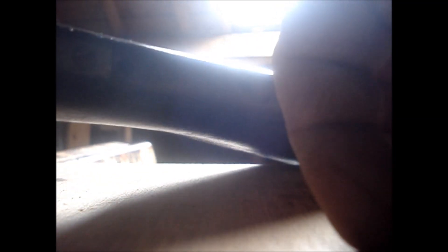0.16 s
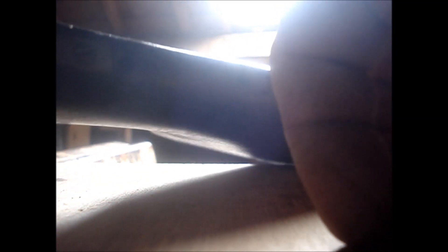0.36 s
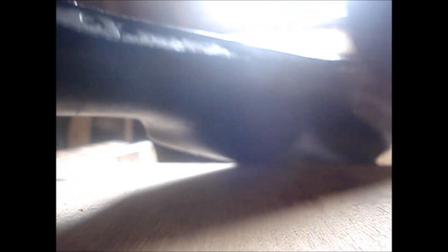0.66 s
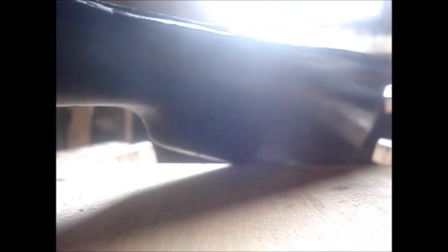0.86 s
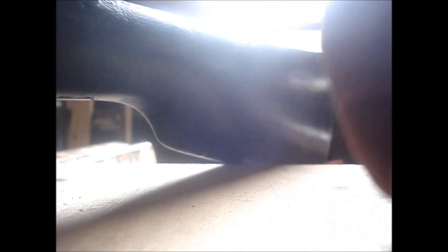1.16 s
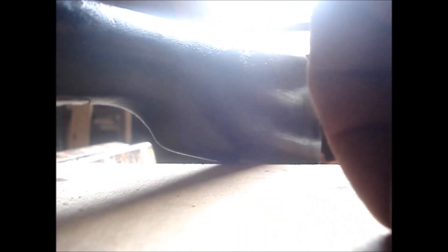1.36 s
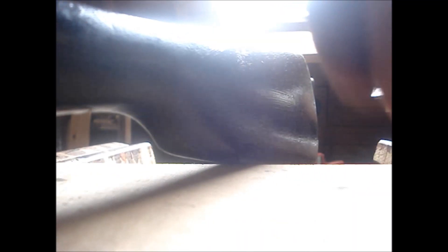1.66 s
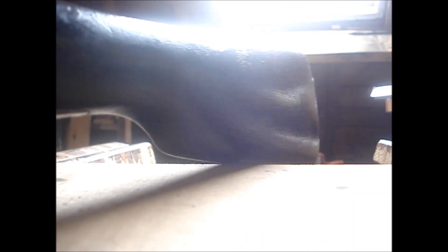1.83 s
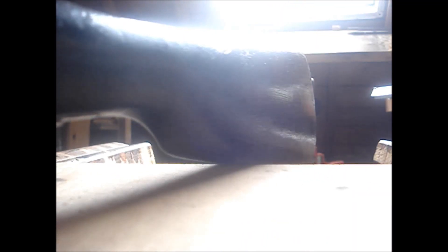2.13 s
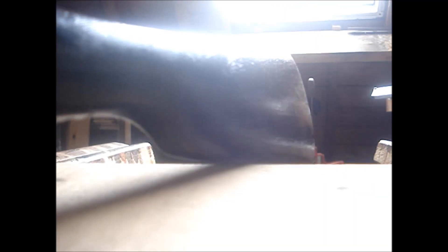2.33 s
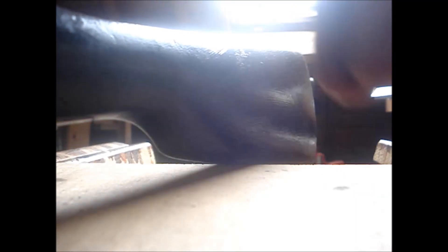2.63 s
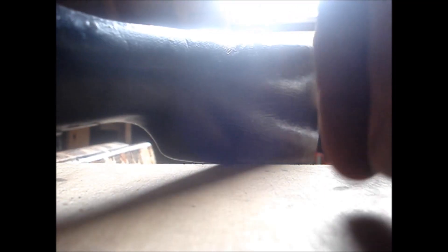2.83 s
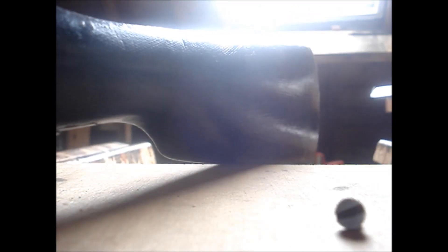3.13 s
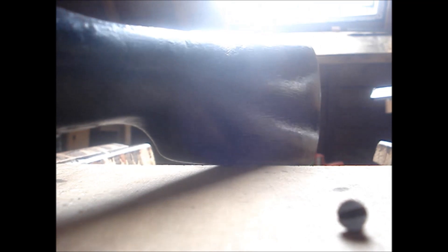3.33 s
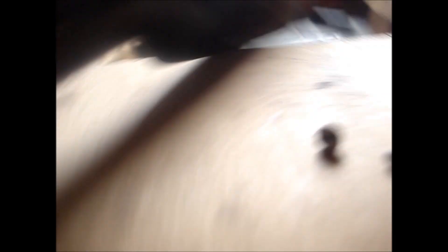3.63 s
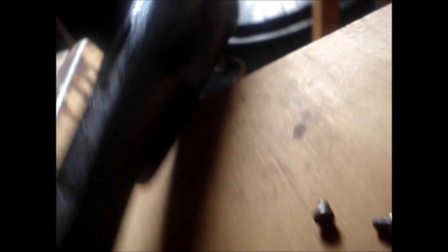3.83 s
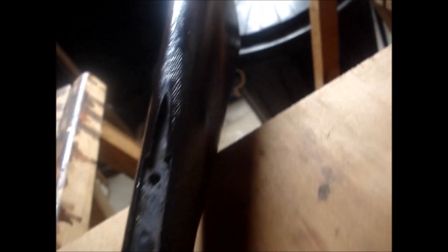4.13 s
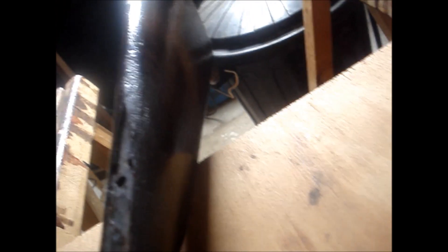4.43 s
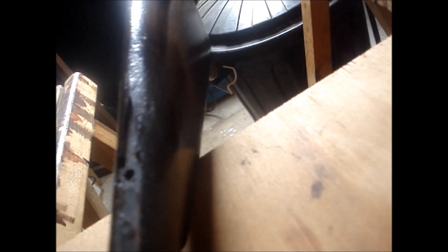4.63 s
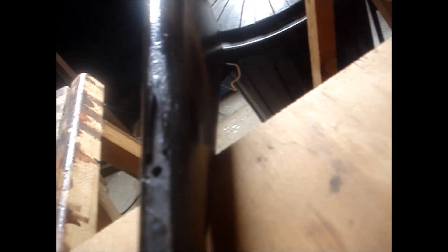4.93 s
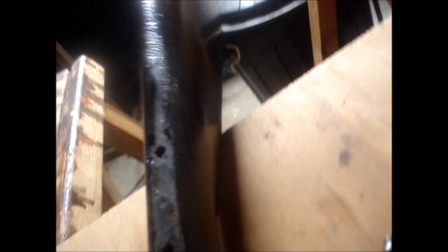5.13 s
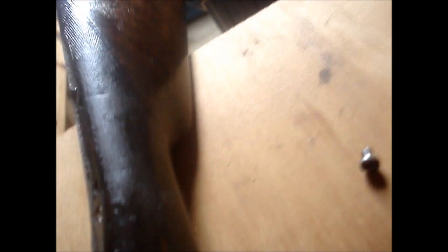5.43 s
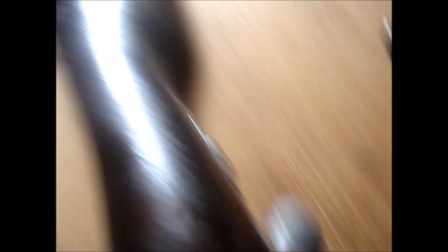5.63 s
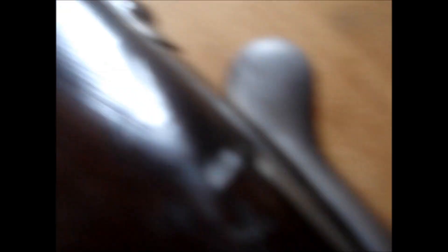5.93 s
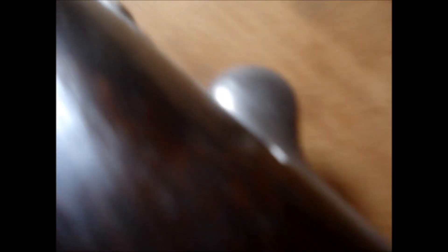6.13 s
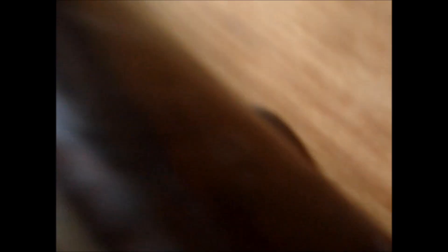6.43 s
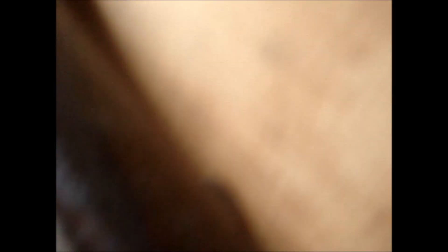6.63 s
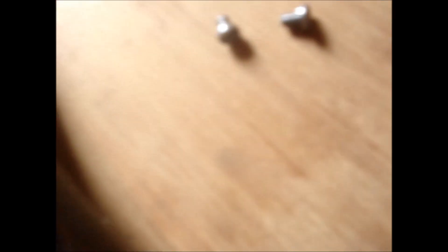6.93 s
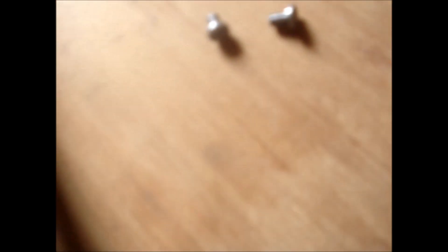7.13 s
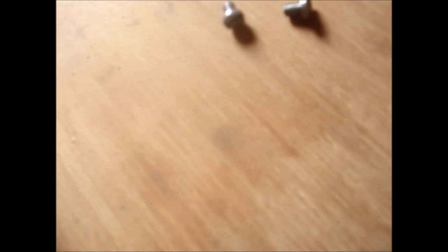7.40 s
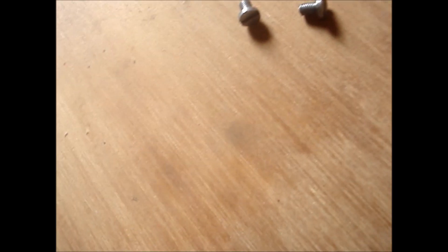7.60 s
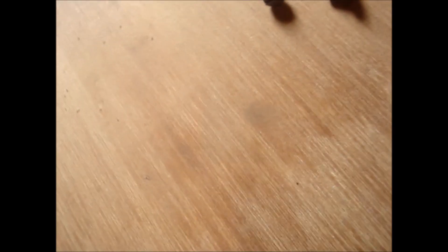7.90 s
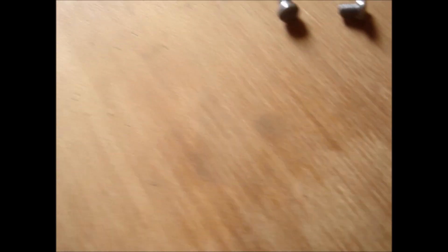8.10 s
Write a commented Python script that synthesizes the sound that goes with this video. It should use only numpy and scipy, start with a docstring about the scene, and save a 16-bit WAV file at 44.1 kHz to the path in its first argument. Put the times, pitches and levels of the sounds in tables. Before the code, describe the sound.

Sharp metal clinks and quiet finger rubbing give way to hard wooden knocks, gritty scrapes and low bench shudders in a small dry room.

```python
"""Steel parts handled on a wooden workbench, very close to a small camera microphone; steady hiss, thin whine.
0-1.6 s: a latch clinks and rubs; blows ring steel and bench modes, a small dry room answers.
2-3.9 s: drags feed the modes with dense grains under finger rustle; a screw clinks; low shudders rock the top.
From 4.3 s: ticks crack, then harder blows; a lever clinks, a block rubs, a wooden stock knocks and judders
in slips, to 8.3 s."""
import sys
import numpy as np
from scipy import signal
from scipy.fft import rfft, irfft
from scipy.io import wavfile

SR = 44100
rng = np.random.default_rng(int(sys.argv[2]) if len(sys.argv) > 2 else 0)


def gain_from_decibels(decibels):
    """Convert decibel values to linear amplitude factors."""
    exponent = np.asarray(decibels, float) / 20
    return 10 ** exponent


def master(y):
    """Save y as 16-bit WAV."""
    cut = np.clip(np.atleast_2d(y).T, -1, 1)
    pcm = np.round(cut * 32767)  # scale
    wavfile.write(sys.argv[1], SR, pcm.astype(np.int16))


N = 364266


def rms_one(x):
    """Scale to rms 1."""
    return x / np.sqrt(np.mean(x ** 2) + 1e-20)


def peak_one(x):
    """Scale to peak 1."""
    return x / (np.max(np.abs(x)) + 1e-20)


def drift(corner_hz):
    """Slow chance, rms 1: white noise through a double pole."""
    pole = np.exp(-2 * np.pi * corner_hz / SR)
    white = rng.standard_normal(N + SR)
    return rms_one(signal.lfilter([1], [1, -2 * pole, pole * pole], white)[SR:])


def coloured_noise(spectrum):
    """Noise shaped by a (hz, db_per_hz) outline; rms 1."""
    hz, db = np.transpose(spectrum)
    bins_hz = np.arange(N // 2 + 1) * SR / N + 1
    gain = gain_from_decibels(np.interp(np.log(bins_hz), np.log(hz), db))
    return rms_one(irfft(rfft(rng.standard_normal(N)) * gain, N))


def rings(modes, count=0, minor_db=-5.0):
    """One decaying sine per mode, as rows; count weaker modes fill the gaps between them."""
    modes = np.array(modes, float)
    steps = (np.arange(count) + rng.random(count)) / max(count, 1)
    minor_hz = modes[0, 0] + (modes[-1, 0] - modes[0, 0]) * steps
    minor_level_db = np.interp(minor_hz, *modes.T[:2]) + minor_db
    minor_t60_s = np.interp(minor_hz, *modes.T[::2])
    hz, db, t60_s = np.hstack([modes.T, [minor_hz, minor_level_db, minor_t60_s]])[:, :, None]
    t = np.arange(SR // 4) / SR
    return gain_from_decibels(db - 60 * t / np.maximum(t60_s, .003)) * np.sin(2 * np.pi * hz * t)


STROKE_EDGE_DB, STROKE_ROUNDNESS = -14, 1.34


def swell(t, start_s, firmest_s, end_s):
    """Gain of a stroke that firms up and fades, STROKE_EDGE_DB at start and end."""
    rising = (firmest_s - t) / (firmest_s - start_s)
    fading = (t - firmest_s) / (end_s - firmest_s)
    away = np.where(t < firmest_s, rising, fading)
    return gain_from_decibels(STROKE_EDGE_DB * away ** STROKE_ROUNDNESS)


# noise floor outline: hz, level_db_per_hz
HISS_SPECTRUM = [(12, -81), (20, -21), (54, -12), (118, -6.5), (184, -4.5), (319, -2.5), (383, -4),
                 (698, -7), (1010, -8.5), (3440, -15.5), (5650, -18), (7730, -22), (10300, -23.5),
                 (13400, -46), (22000, -120)]
HISS_DB, WHINE_DB, WHINE_HZ = -50, -66.5, 7590  # rms levels


def hiss():
    """Steady noise floor and a wavering electrical whine."""
    phase_rad = 2 * np.pi * WHINE_HZ * np.arange(N) / SR + 1.3 * drift(9)
    whine = np.sqrt(2) * np.sin(phase_rad)
    return gain_from_decibels(HISS_DB) * coloured_noise(HISS_SPECTRUM) + gain_from_decibels(WHINE_DB) * whine


# blows: start_s, steel_peak_db, bench_peak_db, brightness_db (added to bright steel, taken from low steel)
CONTACTS = [(0.0462, -13.5, -43, -1), (0.0503, -21.5, -41, 20.5), (0.062, -44, -48, -1),
            (0.089, -20, -46, 8), (0.0725, -51, -52, -5), (0.105, -37, -41, -7), (0.1399, -11, -46, 10.5),
            (0.3533, -21, -45, 1), (0.6962, -36, -42, -7), (0.7086, -50, -16, -17), (1.3063, -45, -62, -9),
            (1.5341, -22, -57, 5.5), (1.5514, -20, -56.5, 1), (2.1764, -43, -61, 12),
            (2.4991, -42, -33, 7.5), (2.878, -27, -14.5, -4.5), (2.891, -33, -13.5, -3),
            (2.936, -13, -42, 18), (2.9772, -25, -45, -9.5), (3.008, -26, -43, 4.5),
            (3.0599, -15.5, -38, 1), (3.0874, -22.5, -35, 2.5), (3.371, -42, -37, -4.5),
            (3.4226, -40, -57, 2), (3.618, -43, -55, 1), (3.899, -49, -39.5, 9), (4.3805, -32.5, -55, 16),
            (5.225, -15, -12, -4), (5.2325, -13.5, -7.5, 6.5), (5.266, -28, -12.5, -4.5),
            (5.3161, -28, -19, 9), (5.392, -40, -20, -8.5), (5.4267, -14.5, -1, 8.5),
            (5.434, -20.5, -5, -11.5), (5.442, -26.5, -16, 15.5), (5.449, -27.5, -10, -10),
            (5.609, -37, -50, 8), (5.7743, -24.5, -13.5, 2), (5.823, -34, -30, 4.5), (5.996, -42, -38, 11),
            (6.0873, -25, -34, 5.5), (6.166, -21, -24, 5.5), (6.405, -25, -19, -5), (6.4176, -21, -15.5, 6),
            (6.4463, -34.5, -17.5, 8), (6.492, -41, -22, -8.5), (6.5918, -23, -23.5, 0),
            (6.702, -34, -51.5, 12), (6.836, -25, -7.5, -5), (7.0777, -29.5, -18, 6),
            (7.1164, -23.5, -9, 4), (7.4877, -40, -20.5, -16.5), (7.677, -16.5, -8, -6.5),
            (7.8059, -19, -12, -4), (7.8153, -22, -13, -6), (7.824, -16.5, -20, 3), (8.0245, -30, -12, 1),
            (8.221, -51.5, -25, -9)]
# bench top modes: pitch_hz, level_db, t60_s
BENCH_MODES = [(174, -5.5, 0.08), (247, 0.5, 0.059), (312, 4.5, 0.06), (400, -1, 0.08254), (430, 1, 0.057),
               (480, -7, 0.038), (539, -7.5, 0.081), (556.4, 3.5, 0.054), (619, -15.5, 0.099),
               (735, -1, 0.026), (860, -7.5, 0.04), (1046, -43, 0.094)]
# lowest bench modes: pitch_hz, level_db, t60_s
BOOM_MODES = [(91.53, -0.5, 0.097), (111, 2.5, 0.078), (128, -5, 0.13)]
# low steel modes: pitch_hz, level_db, t60_s
LOW_STEEL_MODES = [(590.3, -0.5, 0.17), (705, -3.5, 0.082), (908, 1, 0.04), (1106, 0.5, 0.029045),
                   (1326, 1.5, 0.036), (1546, -8.5, 0.11)]
# middle steel modes: pitch_hz, level_db, t60_s
STEEL_MODES = [(1690, -4.5, 0.05667), (1883, -6, 0.078), (2050, -6, 0.099), (2300, -2, 0.0603),
               (2460, -2.5, 0.03266), (2790, -10, 0.0859), (3100, -7, 0.035), (3210, 5, 0.0094)]
# bright steel modes: pitch_hz, level_db, t60_s
BRIGHT_STEEL_MODES = [(3470, -0.5, 0.04572), (3950, 6, 0.022), (4408.5, -10, 0.1), (4943, 8, 0.015),
                      (5210, 6, 0.0069), (4840, -19, 0.024), (5360, -20, 0.05), (6630, -11.5, 0.011),
                      (7005, -31, 0.016), (8700, -39, 0.0074), (9670, -42.5, .01)]
LOW_STEEL_DB, BRIGHT_STEEL_DB = 1.5, -10.5  # re middle modes, at brightness 0
CHATTER_T60_S, RATTLE_DB, RATTLE_T60_S = 0.04, -38.5, 0.16
OPPOSED_SHARE = 0.38  # modes that start against the blow


def contacts(spread_db=2.0, chatter_db=-5.0, even_hz=4000, hardening=0.7, boom_db=-16.0, ring_per_chatter=8.1):
    """A blow and its dying micro-bounces strike every mode with a strength of its own."""
    out, t = np.zeros(N + SR), np.arange(SR // 8) / SR
    bench = np.vstack([rings(BENCH_MODES, count=16), gain_from_decibels(boom_db) * rings(BOOM_MODES)])
    steel = rings(STEEL_MODES, count=45)
    low_steel = rings(LOW_STEEL_MODES, count=25)
    bright_steel = rings(BRIGHT_STEEL_MODES, count=80)
    bodies = [steel, bench, low_steel, bright_steel]
    # the holding hand damps the ringing
    grip = gain_from_decibels(-60 * np.arange(SR // 4) / SR / (ring_per_chatter * CHATTER_T60_S))
    for start_s, steel_db, bench_db, brightness_db in CONTACTS:
        low_db = steel_db + LOW_STEEL_DB - brightness_db
        bright_db = steel_db + BRIGHT_STEEL_DB + brightness_db
        bounces = rng.standard_normal(t.size) * (rng.random(t.size) < .04)
        force = bounces * gain_from_decibels(chatter_db - 60 * t / CHATTER_T60_S)
        # loose play rattles on
        force += rng.standard_normal(t.size) * gain_from_decibels(RATTLE_DB - 60 * t / RATTLE_T60_S)
        force[0] = 1
        # mostly into wood: long soft push; steel on steel: short hard one
        contact_hz = np.clip(even_hz * gain_from_decibels(hardening * (steel_db - bench_db)), 300, 15000)
        force = signal.lfilter(*signal.butter(2, contact_hz, fs=SR), force)
        for body, peak_db in zip(bodies, (steel_db, bench_db, low_db, bright_db)):
            strengths = gain_from_decibels(spread_db * rng.standard_normal(len(body)))
            strengths = strengths * np.sign(rng.random(len(body)) - OPPOSED_SHARE)
            sound = signal.fftconvolve(force, grip * (strengths @ body))
            out[round(start_s * SR):][:sound.size] += gain_from_decibels(peak_db) * peak_one(sound)
    return out[:N]


# latch modes: pitch_hz, level_db, t60_s
LATCH_MODES = [(589.21, 1.5, 0.2), (900, -2, 0.03), (1310, -5.5, 0.0745), (1740, -3.5, 0.099),
               (2150, 2, 0.13), (1914, -10, 0.064), (2330, 1.5, .07), (2548, 2, 0.089), (3005, -0.5, 0.064),
               (3270, 2, 0.05), (3610, -2, 0.075), (4160, -9, 0.04), (4550, -2, 0.041), (4870, 10.5, 0.021),
               (5130, -12, 0.02)]
# latch taps: start_s, peak_db
LATCH_CLINKS = [(.0463, -10), (.0506, -7), (.0892, -10), (.106, -39), (.1398, -3.5), (.1445, -16),
                (.3495, -23.5), (.3535, -17.5), (.237, -39), (1.535, -30), (1.551, -27)]
# screw modes: pitch_hz, level_db, t60_s
SCREW_MODES = [(617.93, -20, .03), (877.6, -0.5, 0.033), (1334, 3, 0.053), (1648.4, 1, 0.055),
               (2120, -7, .04), (2440, -11, 0.05), (2720, 0.5, 0.04256), (3386, -2.5, 0.055),
               (3796.3, 0, 0.035), (4200, -4.5, 0.033), (4869.6, -7, .02), (5500, -11, .02),
               (6330, -6.5, .02), (6540, -22, .02), (7160, -24, .02)]
# screw taps: start_s, peak_db
SCREW_CLINKS = [(2.9365, -10), (2.939, -9.5), (2.9775, -12.5), (2.9992, -24), (3.0078, -20.5),
                (3.0593, -16), (3.063, -19), (3.0873, -19.5), (3.093, -33)]
# lever modes: pitch_hz, level_db, t60_s
LEVER_MODES = [(1250, -6, 0.061), (2040, -15, 0.064), (2130, 4, 0.021), (2280, 1, 0.023),
               (2600, -2.5, 0.029), (2895.5, -4, 0.033), (3180, -10.5, .03), (3670, -4, 0.024),
               (4220, -11.5, .03), (4600, -16, .03), (5800, -14, 0.035), (5900, -30, .04),
               (6630, -13.5, 0.052), (8050, -25, .04)]
# lever taps: start_s, peak_db
LEVER_CLINKS = [(5.7745, -13), (5.812, -28), (5.824, -27.5), (5.997, -33), (6.089, -38), (6.166, -5.5),
                (6.18, -24), (6.418, -26), (7.128, -30), (7.18, -36), (7.296, -33), (7.364, -25.5),
                (7.494, -22), (7.534, -28), (7.775, -25.5), (7.807, -22.5), (7.824, -16)]
# wooden stock modes: pitch_hz, level_db, t60_s
STOCK_MODES = [(565, -6.5, 0.029), (734, 6, 0.041), (894, -5.5, 0.11), (1013, -6.5, 0.018),
               (1303.8, -10.5, 0.031), (1570, -11, 0.047), (1884, -14.5, 0.046)]
# stock knocks: start_s, peak_db
STOCK_KNOCKS = [(2.8785, -22), (2.892, -27), (5.4268, -6.5), (5.443, -8), (5.4495, -7.5), (6.407, -17),
                (6.836, -10.5), (7.059, -25), (7.077, -25), (7.108, -20), (7.489, -11), (7.677, -2.5),
                (7.703, -11), (7.806, -22), (7.83, -21), (8.025, -28), (8.034, -24)]
GRIP_T60_S = .1


def clinks(spread_db=3.0, chatter_db=-29.5, chatter_t60_s=0.034, hardening=0.29, full_db=-4.5):
    """A tap and its brief chatter ring the hand-damped modes of one piece; weak taps and wood are softer."""
    out, t = np.zeros(N + SR), np.arange(SR // 16) / SR
    # modes, taps, contact corner in Hz of a tap at full_db
    pieces = [(LATCH_MODES, LATCH_CLINKS, 9000), (SCREW_MODES, SCREW_CLINKS, 7000),
              (LEVER_MODES, LEVER_CLINKS, 9000), (STOCK_MODES, STOCK_KNOCKS, 2500)]
    grip = gain_from_decibels(-60 * np.arange(SR // 4) / SR / GRIP_T60_S)
    for modes, taps, full_hz in pieces:
        body = rings(modes, count=48, minor_db=-7.0) * grip
        count = len(body)
        signs = (-1) ** np.arange(count)
        chances = rng.standard_normal((len(taps), count + t.size))
        for (start_s, peak_db), chance in zip(taps, chances):
            force = chance[count:] ** 3 * gain_from_decibels(chatter_db - 60 * t / chatter_t60_s)
            force[0] = 1
            contact_hz = np.clip(full_hz * gain_from_decibels(hardening * (peak_db - full_db)), 300, 15000)
            force = signal.lfilter(*signal.butter(2, contact_hz, fs=SR), force)
            strengths = gain_from_decibels(spread_db * chance[:count]) * signs
            sound = signal.fftconvolve(force, strengths @ body)
            out[round(start_s * SR):][:sound.size] += gain_from_decibels(peak_db) * peak_one(sound)
    return out[:N]


ROOM_T60_S, ROOM_DB, ROOM_CUT_HZ = 0.2, -20, 2070


def room(x):
    """A dull dying noise tail that starts after the first wall echo."""
    t = np.arange(SR // 3) / SR
    tail = rng.standard_normal(t.size) * gain_from_decibels(-60 * t / ROOM_T60_S) * (t > .004)
    tail = signal.lfilter(*signal.butter(1, ROOM_CUT_HZ, fs=SR), tail)
    return signal.fftconvolve(x, gain_from_decibels(ROOM_DB) * tail / np.sqrt(np.sum(tail ** 2)))[:N]


# edges catching: start_s, peak_db
TICKS = [(0.0516, -43), (0.0876, -45), (0.141, -42), (1.5345, -56), (2.935, -23.5), (3.057, -53),
         (3.4241, -36), (3.5129, -38), (4.38, -22), (4.4124, -48), (5.2291, -12), (5.316, -24.5),
         (5.432, -22), (5.772, -38), (6.087, -28), (6.1674, -23), (6.4172, -22), (6.5983, -17),
         (6.7047, -32.5), (7.1277, -26.5), (7.18, -26.5), (7.4809, -32), (7.6809, -21.5), (7.734, -27),
         (7.8092, -38), (7.87, -27)]
TICK_T60_S, TICK_LOW_HZ = 0.041, 3500


def ticks():
    """Sharp bright cracks of dying high-passed noise."""
    out, t = np.zeros(N + SR), np.arange(SR // 20) / SR
    noise = rng.standard_normal((len(TICKS), t.size)) * gain_from_decibels(-60 * t / TICK_T60_S)
    cracks = signal.lfilter(*signal.butter(2, TICK_LOW_HZ, "high", fs=SR), noise)
    for (start_s, peak_db), crack in zip(TICKS, cracks):
        out[round(start_s * SR):][:t.size] += gain_from_decibels(peak_db) * peak_one(crack)
    return out[:N]


# latch rubbed along a surface: start_s, firmest_s, end_s, level_db
LATCH_RUBS = [(0.052, 0.054, .08, -39), (0.098, 0.11, 0.11014, -34), (.142, 0.159, .22, -31),
              (.354, 0.356, .39, -42), (1.54, 1.548, 1.6, -41)]
# screw rubbed: start_s, firmest_s, end_s, level_db
SCREW_RUBS = [(2.936, 2.954, 2.975, -27), (2.983, 2.99, 3.0, -43), (2.998, 3.01, 3.04, -40),
              (3.059, 3.062, 3.078, -29.5), (3.085, 3.094, 3.11, -38)]
# lever rubbed: start_s, firmest_s, end_s, level_db
LEVER_RUBS = [(5.79, 5.82, 5.85, -41), (6.0, 6.05, 6.12, -49.5), (6.17, 6.185, 6.23, -45),
              (6.225, 6.289, 6.4, -42.5), (6.366, 6.45, 6.458, -39), (7.072, 7.13, 7.26, -43),
              (7.33, 7.362, 7.42, -46), (7.45, 7.526, 7.7, -33.5), (7.81, 7.83, 7.9, -36)]
# modes of a small block pushed over wood: pitch_hz, level_db, t60_s
BLOCK_MODES = [(383, -14, .06), (780, -10, 0.047), (1038.4, 1.5, 0.12), (1363, -1.5, 0.091),
               (1630, -10, .06), (2130, -13, .08), (2650, -16, .05)]
# block rubbed: start_s, firmest_s, end_s, level_db
BLOCK_RUBS = [(2.756, 2.778, 2.83, -30), (2.783, 2.827, 2.86, -34), (5.248, 5.248, 5.33, -33),
              (5.43, 5.45, 5.52, -29), (7.09, 7.16, 7.25, -30.5), (7.35, 7.402, 7.46, -37),
              (7.467, 7.52, 7.68, -27.5), (7.81, 7.825, 7.88, -31), (8.024, 8.033, 8.07, -34.5)]


def rubs(damping=0.63, lumpy_db=4.5):
    """Gritty friction and loose play keep the modes of a small piece sounding."""
    t, out = np.arange(N) / SR, 0
    # modes, strokes, low-pass corner in Hz
    pieces = [(LEVER_MODES, LEVER_RUBS, 6000), (SCREW_MODES, SCREW_RUBS, 3200),
              (LATCH_MODES, LATCH_RUBS, 7000), (BLOCK_MODES, BLOCK_RUBS, 3000)]
    for modes, strokes, soft_hz in pieces:
        grit = rng.standard_normal(N)
        grit = rms_one(grit * np.abs(grit) * gain_from_decibels(lumpy_db * drift(50)))
        level = sum(gain_from_decibels(level_db) * swell(t, *stroke) for *stroke, level_db in strokes)
        rows = rings(np.multiply(modes, [1, 1, damping]), count=20, minor_db=-8.0)
        body = signal.lfilter(*signal.butter(2, soft_hz, fs=SR), rows.sum(axis=0))
        out = out + signal.fftconvolve(level * grit, body)[:N] / np.sqrt(np.sum(body ** 2))
    return out


# dragging and rubbing strokes: start_s, firmest_s, end_s, bench_db, rustle_db
DRAGS = [(0.626, 0.707, .71, -54, -48.5), (0.7, 0.716, .8, -60, -56.5), (1.26, 1.318, 1.42, -47.5, -57.5),
         (1.55, 1.58, 1.64, -51, -65.5), (2.748, 2.797, 2.87, -44.5, -44), (3.35, 3.37, 3.41, -55, -52.5),
         (3.427, 3.427, 3.49, -49.5, -45.5), (3.49, 3.534, 3.61, -49.5, -39.5),
         (3.62, 3.635, 3.75, -50, -55), (3.943, 3.97, 4.05, -51.5, -51.5), (4.339, 4.386, 4.42, -38, -62),
         (5.266, 5.293, 5.36, -22.5, -51), (5.343, 5.434, 5.56, -30, -52.5), (5.557, 5.732, 5.82, -29, -42),
         (5.987, 6.105, 6.17, -34.5, -52.5), (6.222, 6.302, 6.35, -32.5, -45.5),
         (6.316, 6.396, 6.55, -31.5, -45.5), (6.355, 6.45, 6.465, -33, -41), (7.53, 7.6, 7.68, -32, -48),
         (6.52, 6.602, 6.64, -32.5, -62), (0.803, .86, .95, -69, -85), (5.867, 5.934, 5.99, -52.5, -53),
         (6.922, 6.928, 6.99, -37, -65), (7.072, 7.15, 7.27, -17, -42.5), (7.245, 7.29, 7.34, -27, -50),
         (7.32, 7.393, 7.44, -27.5, -49), (7.42, 7.46, 7.49, -18.5, -45.5), (7.48, 7.5, 7.64, -16, -41),
         (7.66, 7.695, 7.75, -18, -42), (7.726, 7.8, 7.95, -27.5, -47.5), (8.019, 8.02, 8.15, -42.5, -57),
         (8.185, 8.223, 8.27, -38.5, -72.5)]
# steel sliding on steel: start_s, firmest_s, end_s, level_db
SLIDES = [(1.304, 1.32, 1.36, -50), (0.084, 0.11, 0.12, -33.5), (2.975, 3.01, 3.04, -49),
          (3.51, 3.54, 3.58, -45.5), (6.23, 6.3, 6.37, -57), (5.43, 5.445, 5.5, -31.5),
          (7.81, 7.826, 7.87, -23.5)]
DRAG_BOOM_DB, DRAG_STEEL_DB = -19.5, 1  # boom re bench; steel offset
STEEL_FOLLOWS_BENCH = 0.48983  # 0: steel follows rustle, 1: bench


def drag_levels():
    """One pressure sets boom, bench, steel and rustle of a stroke; slides add steel."""
    t, levels = np.arange(0, N / SR + .002, .001), np.zeros((4, 1))
    for *stroke, bench_db, rustle_db in DRAGS:
        steel_db = DRAG_STEEL_DB + rustle_db + STEEL_FOLLOWS_BENCH * (bench_db - rustle_db)
        peaks = gain_from_decibels(np.array([[bench_db + DRAG_BOOM_DB], [bench_db], [steel_db], [rustle_db]]))
        levels = np.hypot(levels, peaks * swell(t, *stroke))
    boom, bench, steel, rustle = levels
    for *stroke, level_db in SLIDES:
        steel = np.hypot(steel, gain_from_decibels(level_db) * swell(t, *stroke))
    return np.array([np.interp(np.arange(N) / SR, t, level) + 1e-9 for level in (boom, bench, steel, rustle)])


# light finger rustle outline: hz, level_db_per_hz
RUSTLE_SPECTRUM = [(1760, -19), (3000, -1.5), (4380, -18.5), (6820, -6.5), (7240, -4.5), (7850, -6.5),
                   (10000, -9), (13000, -43), (22000, -120)]
# heavy part scrape outline: hz, level_db_per_hz
SCRAPE_SPECTRUM = [(1650, -31.5), (2800, -10), (3360, -7.5), (3630, -6), (5720, -11.5), (6260, -11),
                   (10000, -26), (13000, -71), (22000, -120)]


def drags(grains_per_s=1200, grain_db=2.5, lumpy_db=3.0, damping=0.64, soft_hz=1500, heavy_db=-3.5, shift_db=2.5):
    """Rough surfaces catch in dense soft grains that feed hand-damped modes, with friction noise on top."""
    boom, bench, steel, rustle = drag_levels()
    pressure = gain_from_decibels(lumpy_db * drift(71))
    # light fingers rustle brightly; a heavy part that shakes the bench scrapes duller
    heavy = bench ** 2 / (bench ** 2 + (gain_from_decibels(heavy_db) * rustle) ** 2)
    friction = np.sqrt(1 - heavy) * coloured_noise(RUSTLE_SPECTRUM)
    friction = friction + np.sqrt(heavy) * coloured_noise(SCRAPE_SPECTRUM)
    out = rustle * friction * pressure
    bodies = [(boom, BOOM_MODES), (bench, BENCH_MODES), (steel, LOW_STEEL_MODES[1:] + STEEL_MODES)]
    for level, modes in bodies:
        sizes = gain_from_decibels(grain_db * np.minimum(rng.exponential(1, N), 5)) * rng.choice([-1, 1], N)
        grains = sizes * (rng.random(N) < grains_per_s / SR) * pressure
        rows = rings(np.multiply(modes, [1, 1, damping]))
        signs = (-1) ** np.arange(len(rows))[:, None]
        rows = signal.lfilter(*signal.butter(1, soft_hz, fs=SR), signs * rows)
        # as the contact travels, other modes take the lead: every third mode shares a drift
        forces = [rms_one(gain_from_decibels(shift_db * drift(11.3))) * level * grains for _ in range(3)]
        sound = sum(signal.fftconvolve(force, rows[k::3].sum(axis=0))[:N] for k, force in enumerate(forces))
        out += sound / np.sqrt(np.mean(grains ** 2) * np.sum(rows.sum(axis=0) ** 2))
    return out


# dull low rocking of the bench: start_s, level_db, pitch_hz, t60_s
SHUDDERS = [(.48, -51, 90, 0.904), (.722, -35, 90.86, 0.52), (2.875, -31, 111, 0.21),
            (3.369, -35, 113, 0.12), (3.441, -29, 125, 0.074), (3.534, -44, 104, 0.27),
            (3.635, -44.5, 120, .3), (3.911, -25, 110, 0.12), (5.685, -26.5, 135, 0.16),
            (6.072, -38, 117, .3), (6.378, -33, 126, 0.13), (6.443, -31, 114, 0.1132),
            (6.834, -39, 130, 0.12), (7.073, -22, 134.5, 0.68), (7.141, -16.5, 129, 0.37),
            (7.279, -24, 110, 0.32), (7.431, -18.5, 123, 0.2), (7.791, -25, 105.4, 0.31),
            (8.026, -33, 123, 0.38), (8.221, -32, 125, 0.28)]


def shudders(push_s=0.0025, waver_rad=0.87):
    """A soft push sets the whole top rocking at a low, unsteady pitch."""
    out, t = np.zeros(N + SR), np.arange(SR // 3) / SR
    unsteady_rad = waver_rad * np.tile(drift(16.6), 2)
    for start_s, level_db, pitch_hz, t60_s in SHUDDERS:
        start = round(start_s * SR)
        at = slice(start, start + t.size)
        envelope = gain_from_decibels(level_db - 60 * t / t60_s) * (1 - np.exp(-t / push_s))
        out[at] += envelope * np.sin(2 * np.pi * pitch_hz * t + unsteady_rad[at])
    return out[:N]


# stock slipping over the bench: start_s, firmest_s, end_s, level_db
JUDDERS = [(2.767, 2.813, 2.87, -40), (5.655, 5.725, 5.78, -39.5), (6.25, 6.29, 6.36, -50),
           (6.92, 6.948, 6.99, -45), (7.082, 7.14, 7.23, -23.5), (7.463, 7.49, 7.66, -22.5),
           (7.807, 7.812, 7.89, -31.5)]
MEDIAN_SLIPS_PER_S, SLIP_JITTER, SLIP_SPREAD_DB = 140, .25, 1


def judders(damping=0.54):
    """Uneven stick-slip pulses ring the wooden stock."""
    t, slips = np.arange(N) / SR, np.zeros(N)
    chance = rng.standard_normal((2000, 2))
    at = np.cumsum(SR / MEDIAN_SLIPS_PER_S * np.exp(SLIP_JITTER * chance[:, 0])).astype(int)
    slips[at[at < N]] = gain_from_decibels(SLIP_SPREAD_DB * chance[at < N, 1])
    level = sum(gain_from_decibels(level_db) * swell(t, *stroke) for *stroke, level_db in JUDDERS)
    body = rings(np.multiply(STOCK_MODES, [1, 1, damping]), count=10).sum(axis=0)
    return signal.fftconvolve(level * slips, body)[:N] / np.sqrt(np.mean(slips ** 2) * np.sum(body ** 2))


BENCH_LOW_HZ = 77.7


def scene():
    """All handling sounds, weak below the bench's lowest mode, plus room and hiss."""
    handling = contacts() + clinks() + judders() + rubs() + drags() + ticks() + shudders()
    high_pass = signal.butter(6, BENCH_LOW_HZ, "high", fs=SR, output="sos")
    bench = signal.sosfilt(high_pass, handling)
    return (bench + room(bench) + hiss())[None]


def roll_off(x):
    """The treble ends steeply here."""
    return signal.sosfilt(signal.butter(12, 10470, fs=SR, output="sos"), x)


LOPSIDED, THUMP_FROM_HZ, THUMP_TOP_HZ = 0.6, 1100, 60
CUTOFF_HZ = 10550  # 60 dB down from here up


def record(dry):
    """Loud treble drives the lopsided preamp into a low thump; peaks are rounded, the top is cut."""
    treble = signal.lfilter(*signal.butter(2, THUMP_FROM_HZ, "high", fs=SR), dry)
    thump_band = signal.butter(2, [10, THUMP_TOP_HZ], "band", fs=SR, output="sos")
    thump = signal.sosfilt(thump_band, treble ** 2)
    rounded = 0.77 * np.tanh(dry / 0.88)
    low_pass = signal.cheby2(16, 60, CUTOFF_HZ, fs=SR, output="sos")
    mix = signal.sosfilt(low_pass, rounded + LOPSIDED * thump)
    return roll_off(mix)


dry = scene()
out = record(dry)
master(out)
```